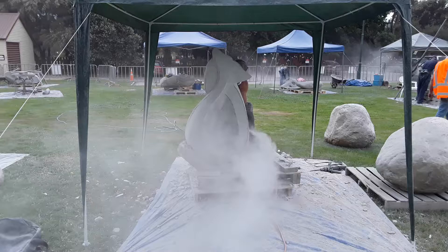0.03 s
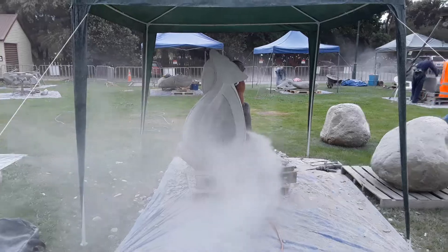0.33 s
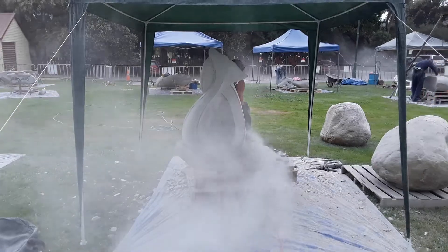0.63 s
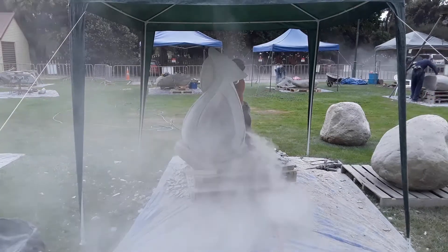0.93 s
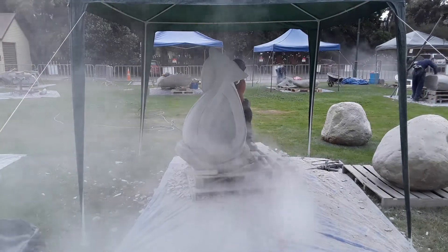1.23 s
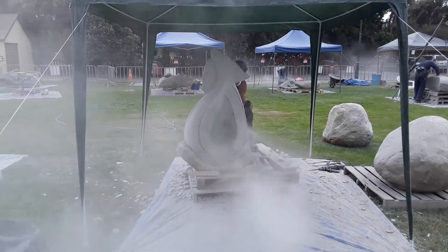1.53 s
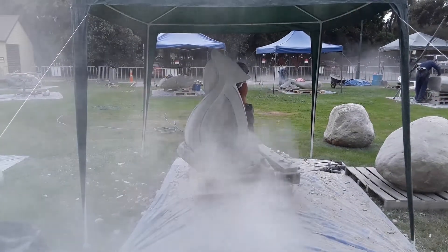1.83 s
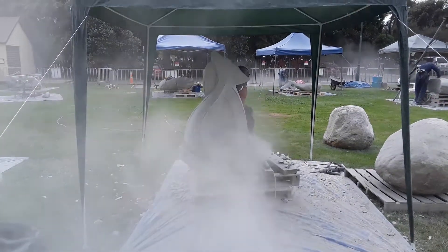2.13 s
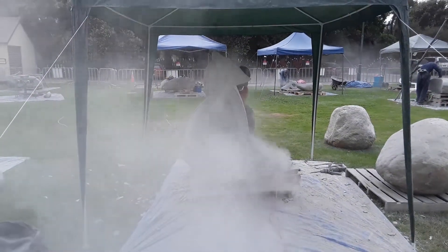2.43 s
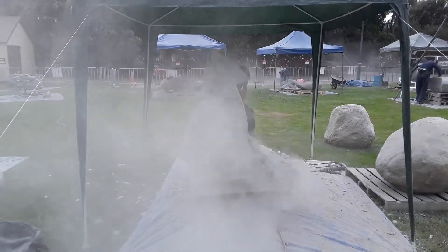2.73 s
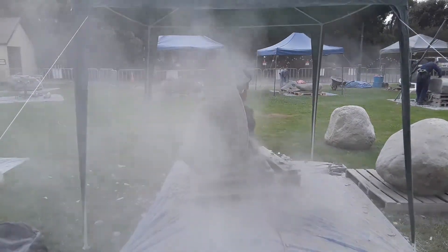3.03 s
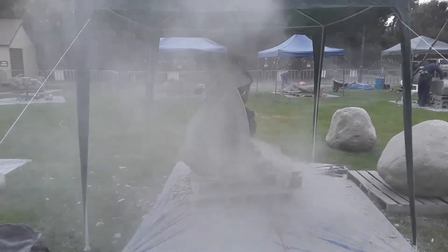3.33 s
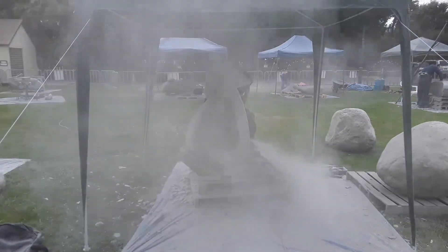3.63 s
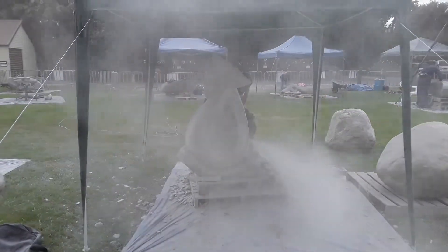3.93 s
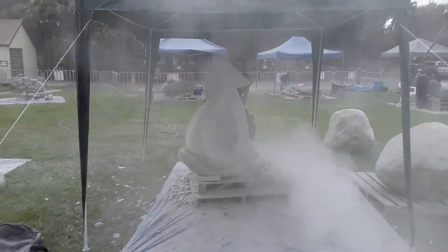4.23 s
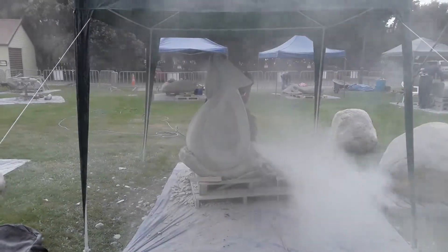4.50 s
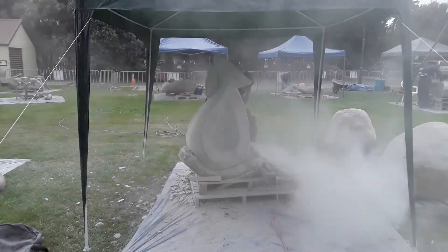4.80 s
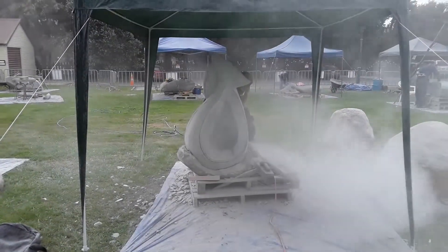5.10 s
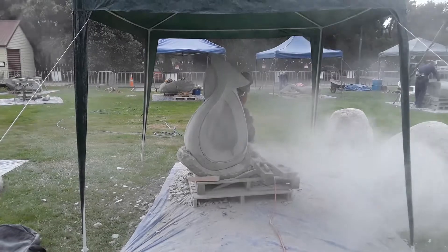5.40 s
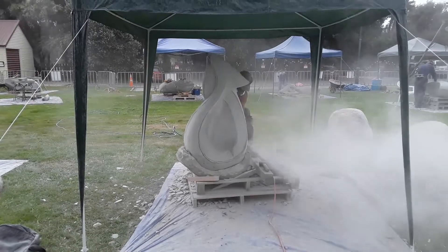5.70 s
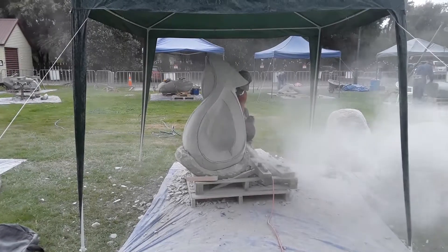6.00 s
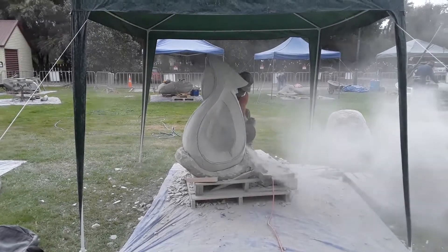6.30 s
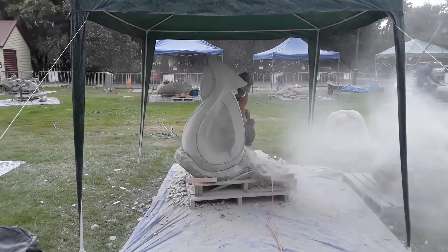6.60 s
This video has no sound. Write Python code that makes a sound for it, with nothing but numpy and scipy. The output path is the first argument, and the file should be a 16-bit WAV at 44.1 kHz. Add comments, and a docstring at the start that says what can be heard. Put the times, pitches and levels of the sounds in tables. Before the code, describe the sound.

An angle grinder cuts into stone outdoors with a loud, harsh, hissing rasp. The steel blade rings and squeals over a thin gear whine that sags and rises with the load, and a dull crumbling lies underneath. The cutting eases briefly after about a second, bites again for a long stroke, then eases and resumes once more near the end. Flying chips tap lightly on the slightly overloaded microphone.

```python
"""An angle grinder's diamond blade cuts stone outdoors; the sculptor eases off twice between strokes.
Fracturing grit rasps and excites the steel blade's modes, and friction sustains some as squeals.
The slot walls make the blade flutter, stone crumbles, and the gear whine sags under load.
Flying chips tap the camera, whose microphone is overloaded by the din."""
import sys
import numpy as np
from scipy import signal
from scipy.fft import rfft, irfft, next_fast_len
from scipy.io import wavfile
from scipy.ndimage import map_coordinates

SR = 44100
rng = np.random.default_rng(int(sys.argv[2]) if len(sys.argv) > 2 else 0)


def log_audio(samples):
    """Write samples as a 16-bit WAV file to the path given in sys.argv[1]."""
    # one column per channel
    frames = np.atleast_2d(samples).T
    # limit to full scale, then quantise
    limited = np.clip(frames, -1, 1)
    pcm = np.round(limited * 32767).astype(np.int16)
    wavfile.write(sys.argv[1], SR, pcm)


N = 297675


def amp(db):
    """Amplitude ratio of a level in decibels."""
    return 10 ** (np.asarray(db) / 20)


def unit(x):
    """Normalisation to an rms of 1."""
    return x / np.sqrt(np.mean(x ** 2) + 1e-20)


def curve(points):
    """Linear interpolation of (time_s, value) points, one value a sample."""
    return np.interp(np.arange(N) / SR, *np.transpose(points))


def wobble(rate_hz, size=N):
    """Slow random modulation: a spline through rate_hz random knots a second."""
    knots = rng.standard_normal(int(size * rate_hz / SR) + 4)
    return map_coordinates(knots, [np.arange(size) * rate_hz / SR])


def filtered(x, response):
    """Zero-phase filtering: the spectrum of x times response(hz)."""
    size = next_fast_len(N + 8192)
    return irfft(rfft(x, size) * response(np.fft.rfftfreq(size, 1 / SR)), size)[..., :N]


def colour(points, hz):
    """Spectral envelope: gain through (frequency_hz, level_db) points on a log frequency axis."""
    point_hz, level_db = np.transpose(points)
    return amp(np.interp(np.log(hz + 1), np.log(point_hz), level_db))


def resonances(modes, hz):
    """Summed power response of damped resonators."""
    return sum(amp(db) ** 2 * (hz * width) ** 2 / ((centre ** 2 - hz ** 2) ** 2 + (hz * width) ** 2)
               for centre, width, db in modes)


def grit(turns, runout_db, clump_db):
    """Amplitude-modulated noise: countless grain fractures, in clumps and harder once in each turn."""
    return rng.standard_normal(N) * amp(runout_db * np.sin(2 * np.pi * turns) + clump_db * wobble(260))


def shifting_ring(x, t60_s, wet_db, places):
    """Dense, short-lived modes, crossfaded from place to place as the blade travels along the slot."""
    t = np.arange(SR // 8) / SR
    place = np.linspace(0, places - 1, N)
    ringing = np.zeros(N)
    for k in range(places):
        tail = rng.standard_normal(len(t)) * amp(-60 * t / t60_s)
        near = np.flatnonzero(np.abs(place - k) < 1)
        drive = x[near] * np.cos(np.pi / 2 * (place[near] - k))
        ring = signal.fftconvolve(drive, tail / np.linalg.norm(tail))[:N - near[0]]
        ringing[near[0]:near[0] + len(ring)] += ring
    return x + amp(wet_db) * ringing


def rasp(turns):
    """Broadband excitation: fractures are heard directly and through the resonances of the steel."""
    # spectrum of diamond on stone: frequency_hz, level_db
    spectrum = [(300, -37.5), (1300, -19.5), (1650, -8.5), (2850, -12), (3350, -6), (4900, -11),
                (5400, -3.5), (6300, -1), (7700, 1.5), (8700, -2), (11000, -9), (13700, -19),
                (14800, -10.5), (16000, -15.5)]
    # modes of the blade and its guard: pitch_hz, width_hz, level_db
    modes = [(2526, 330, -11), (3120, 29, -6), (4340, 76, -7.5), (4537, 81, -3), (5340, 140, 0),
             (5600, 200, 2), (6070, 110, -0.5), (6430, 61, -1), (6670, 90, 3), (7000, 120, 1),
             (7340, 61, 3), (7520, 220, 3.5), (7940, 210, 2), (8270, 68, 4), (8970, 150, -4.5),
             (9680, 97, -4), (10700, 190, -4.5), (11870, 250, -7), (12960, 260, -5), (13300, 160, -15)]
    fractures = grit(turns, runout_db=1.0, clump_db=0.63)
    ringing = shifting_ring(fractures, t60_s=.08, wet_db=-7, places=14)
    return unit(filtered(ringing, lambda hz: np.sqrt(colour(spectrum, hz) ** 2 + resonances(modes, hz))))


def fine_grit(x, treble_db, corner_hz):
    """Treble shelf: a light touch sheds less fine grit, so the top of the rasp fades first."""
    treble = filtered(x, lambda hz: hz ** 8 / (hz ** 8 + corner_hz ** 8))
    return x + treble * (amp(treble_db) - 1)


def squeals(drift, blur, flicker_db, attack_s, release_s):
    """Self-excited vibration: friction sustains single blade modes, wavering in pitch and strength; a few
    spells are the blade ringing on freely while it is lifted."""
    # spells locked onto one mode: start_s, end_s, pitch_hz, level_db (relative to the rasp)
    spells = [(.1, 1.202, 7500, -9), (.1, 1.35, 8050, -18), (.1, 1.3, 5630, -20), (.1, 1.2, 12780, -24),
              (1.19, 1.42, 3050, -19), (1.385, 1.48, 7100, -12), (1.37, 1.53, 9308, -13),
              (1.37, 1.6, 12435, -23), (1.516, 1.81, 2060, -15), (1.604, 2.1, 1728, -18.5),
              (1.517, 1.66, 5320, -11.5), (1.52, 3.7, 6600, -13), (1.52, 3.7, 7600, -12),
              (1.92, 2.32, 7610, -7.5), (1.55, 3.5, 11960, -24), (2.2, 3.503, 4550, -22),
              (2.949, 3.45, 2055, -22), (4.2, 5.6, 7335, -11.5), (4.598, 6.3, 4420, -23),
              (5.98, 6.75, 7490, -11), (6.15, 6.75, 7230, -14), (6.3, 6.75, 4540, -20)]
    tones = np.zeros(N)
    for start, end, hz, db in spells:
        span = np.arange(int(start * SR), min(int(end * SR), N))
        size = len(span)
        pitch_hz = hz * (1 + drift * wobble(9, size) + blur * wobble(170, size))
        grip = amp(flicker_db * (0.8 * wobble(54.8, size) + wobble(15.9, size)))
        swell = np.clip(np.minimum((span - span[0]) / attack_s, (span[-1] - span) / release_s) / SR, 0, 1)
        tones[span] += amp(db) * swell * unit(grip * np.sin(2 * np.pi * np.cumsum(pitch_hz) / SR))
    return tones


def flutter(turns):
    """Forced vibration: the slot walls knock the blade into bending modes, which radiate no bass."""
    # low bending modes of the blade: pitch_hz, width_hz, level_db
    modes = [(1136, 76, -10.5), (1526, 25, -11), (1735, 23, -3.5), (2046, 20, 0.5), (2142, 39, 1.5),
             (2578, 46, -8.5)]
    knocks = grit(turns, runout_db=0.5, clump_db=-0.65)
    radiation = lambda hz: hz ** 8 / (hz ** 8 + 1400 ** 8)
    return unit(filtered(knocks, lambda hz: np.sqrt(resonances(modes, hz)) * radiation(hz)))


def wall_contact(ease_db, steady_db, clear_db, attack_s, release_s):
    """Flutter gain: steady contact and rubs add in power, fading as the easing falls below clear_db."""
    # rubs of the blade on a slot wall: start_s, length_s, level_db
    rubs = [(0.53, .08, -21), (.95, 0.45, -24.5), (1.497, 0.24, -21.5), (2.27, 0.078, -20),
            (2.925, 0.59, -23.5), (3.864, 0.048, -21), (5.97, 0.11, -18), (6.164, 0.11, -17),
            (6.453, .12, -18), (6.7, .05, -18.5)]
    t = np.arange(N) / SR
    power = amp(steady_db) ** 2
    for start, length, db in rubs:
        rise = np.clip((t - start) / attack_s, 0, 1)
        decay = np.exp(-np.maximum(t - start - length, 0) / release_s)
        power = power + (amp(db) * rise * decay) ** 2
    return np.sqrt(power) * amp(2.9 * np.minimum(ease_db - clear_db, 0))


def gears(turns, mesh_hz, teeth, rattle_rad, eccentric_rad, flicker_db):
    """Phase modulation: tooth play blurs the mesh tone and an eccentric wheel adds sidebands."""
    # gear case modes, which ring as the mesh tone passes through: pitch_hz, width_hz, level_db
    case_modes = [(3650, 58, 9), (4090, 17, 8)]
    angle = 2 * np.pi * turns
    phase = teeth * angle + rattle_rad * wobble(150) + eccentric_rad * np.sin(angle)
    whine = unit(np.sin(phase) * amp(flicker_db * wobble(45)))
    return whine * np.sqrt(1 + resonances(case_modes, mesh_hz))


def whirr():
    """Resonant flow noise: cooling air rushes through the motor housing."""
    # resonances of the whirr: pitch_hz, width_hz, level_db
    modes = [(3096, 81, -0.5), (3340, 110, -1.5), (3630, 150, -1.5), (3900, 100, 0)]
    return unit(filtered(rng.standard_normal(N), lambda hz: resonances(modes, hz)))


def shaft(turns):
    """Rotational harmonics: a faint hum locked to the spindle."""
    # tones of the shaft and its fan: cycles_per_turn, level_db
    harmonics = [(2, -54.5), (12, -48)]
    return sum(amp(db) * unit(np.sin(2 * np.pi * k * turns + .5 * wobble(40))) for k, db in harmonics)


def site():
    """Masking: a steady distant rumble lies under the din and shows when the blade is lifted."""
    # spectrum of the open-air site: frequency_hz, level_db
    spectrum = [(30, -27), (68, -1), (200, -4), (600, -8), (3000, -27)]
    return unit(filtered(rng.standard_normal(N), lambda hz: colour(spectrum, hz)))


def crumble(turns):
    """Brittle fracture: stone breaks in clumps, giving a dull, lumpy rush."""
    # spectrum of the crumbling: frequency_hz, level_db
    spectrum = [(20, -30), (45, -42), (75, -4), (160, 0.5), (400, 2.5), (1200, 2.5), (2000, -12),
                (5000, -23)]
    fractures = grit(turns, runout_db=-0.5, clump_db=2.5)
    return unit(filtered(fractures, lambda hz: colour(spectrum, hz)))


def chips(contact_s, body_hz):
    """Impulse response: each chip gives the camera one short push, from which it springs back."""
    # chip impacts: time_s, peak_db
    impacts = [(0.146, -15), (.226, -15), (0.606, -17), (2.119, -23.5), (3.466, -16), (3.714, -21),
               (4.103, -21), (4.256, -15), (4.309, -18), (4.44, -11), (4.511, -13), (4.707, -15),
               (4.749, -22), (4.964, -19), (6.45, -24)]
    t = np.arange(SR // 20) / SR
    force = -t / contact_s * np.exp(1 - t / contact_s)
    tap = signal.sosfilt(signal.butter(2, body_hz, "high", fs=SR, output="sos"), force)
    blows = np.zeros(N)
    for time_s, db in impacts:
        blows[round(time_s * SR)] += amp(db)
    return signal.fftconvolve(blows, tap / np.abs(tap).max())[:N]


def easing(depth_db, ease_s, catch_s, kick_db, kick_s):
    """Exponential relaxation: pressure (dB) falls between strokes and kicks back as the blade catches."""
    # strokes of the cut: catch_s, release_s
    strokes = [(.05, 1.094), (1.512, 5.77), (5.997, 6.8)]
    t = np.arange(N) / SR
    ease_db = np.zeros(N)
    for (_, release), (catch, _) in zip(strokes, strokes[1:]):
        lift = 1 - np.exp(-np.maximum(t - release, 0) / ease_s)
        caught = np.clip((t - catch) / catch_s, 0, 1)
        kick = np.exp(-np.abs(t - catch) / kick_s)
        ease_db += caught * kick_db * kick - (1 - caught) * depth_db * lift
    return ease_db


def scene():
    """Superposition: hand pressure sets the levels of the cut, and one spindle speed modulates it."""
    # how hard the hand leans on the tool: time_s, push_db
    push = [(.1, 2), (1.05, 1), (1.6, -3), (2.1, -1.5), (2.35, 2), (2.85, -4.5), (3.55, 0), (4.45, 3.5),
            (5.1, 1), (5.6, -0.6), (5.77, 1), (6.05, -3.5), (6.3, -1), (6.6, -2.5), (6.75, 0.5)]
    # motor speed, as the gear mesh frequency: time_s, mesh_hz
    speed = [(.1, 3320), (.6, 3400), (1, 3550), (1.25, 3740), (1.5, 4030), (1.85, 4085), (2.3, 4095),
             (2.7, 3980), (3.2, 4060), (3.6, 3960), (3.9, 3660), (4.65, 3250), (5.2, 3310), (5.85, 3440),
             (6.03, 3635), (6.75, 3665)]
    push_db, mesh_hz, teeth = curve(push), curve(speed), 37
    ease_db = easing(depth_db=19, ease_s=0.34, catch_s=0.019, kick_db=2.5, kick_s=0.025)
    pressure_db = push_db + 0.9 * wobble(22)  # the hand trembles
    turns = np.cumsum(mesh_hz + 7 * wobble(11)) / SR / teeth
    strain = 1 - mesh_hz / mesh_hz.max()
    rattle_rad = .25 + 4 * strain - .03 * ease_db  # gears rattle when dragged down or slack
    bite_db = -8.5 + 0.5 * pressure_db + 0.56 * ease_db
    whine_db = -34 - 0.47 * push_db - 0.23 * ease_db  # stands out under a light load
    crumble_db = -33 + 1.55 * pressure_db + 1.2 * ease_db

    cutting = fine_grit(rasp(turns), treble_db=.15 * ease_db + .085 * push_db, corner_hz=10100)
    cutting += squeals(drift=0.002012, blur=.002, flicker_db=2.5, attack_s=0.0093, release_s=0.025)
    contact = wall_contact(ease_db, steady_db=-25.5, clear_db=-10.5, attack_s=0.036, release_s=0.081)
    mix = amp(bite_db) * cutting + contact * flutter(turns)
    mix += amp(whine_db) * gears(turns, mesh_hz, teeth, rattle_rad, eccentric_rad=0.7, flicker_db=3.0)
    mix += amp(-28.5) * whirr() + shaft(turns)
    mix += amp(-49.5) * site()
    mix += amp(crumble_db) * crumble(turns)
    mix += chips(contact_s=0.00056, body_hz=62)
    return np.array([mix, mix])


def record(dry, open_s=.1055, ceiling=0.7, hardness=6, low_cut_hz=42, top_hz=15780):
    """Saturation and band limiting: the microphone opens, flattens peaks, and cuts bass and top treble."""
    x = dry * (np.arange(N) / SR > open_s)
    x = x / (1 + np.abs(x / ceiling) ** hardness) ** (1 / hardness)
    x = signal.sosfilt(signal.butter(3, low_cut_hz, "high", fs=SR, output="sos"), x)
    return filtered(x, lambda hz: hz < top_hz)


dry = scene()
out = record(dry)
log_audio(out)
```